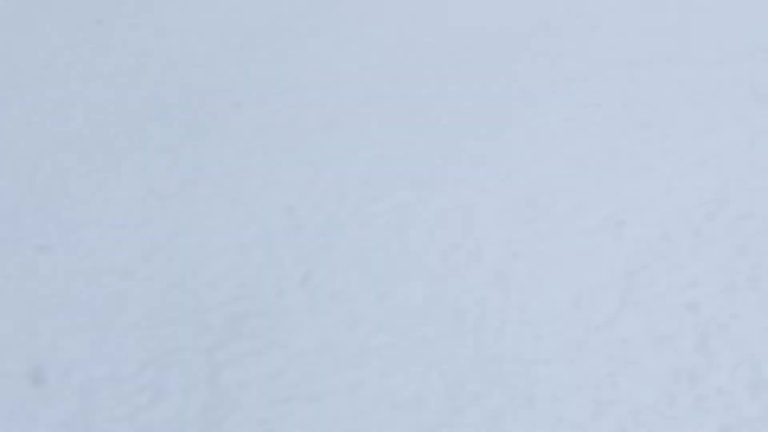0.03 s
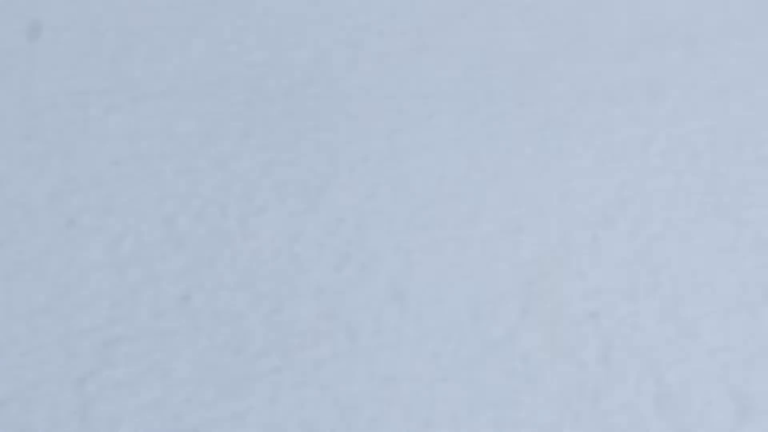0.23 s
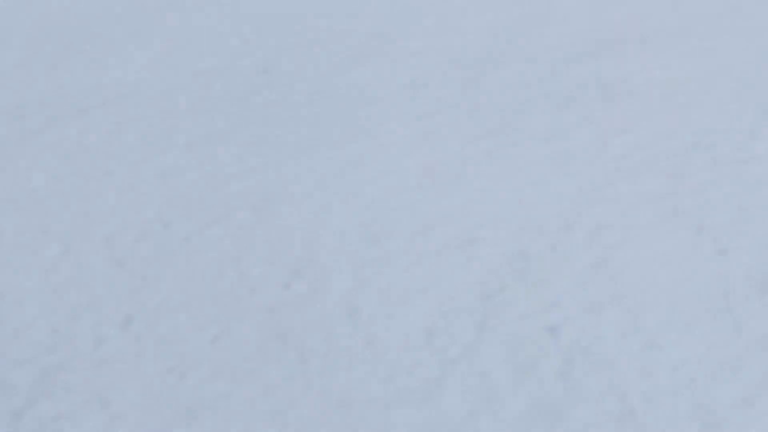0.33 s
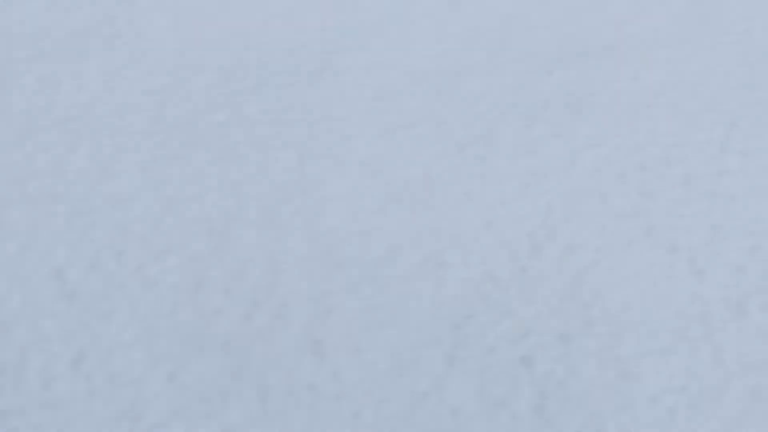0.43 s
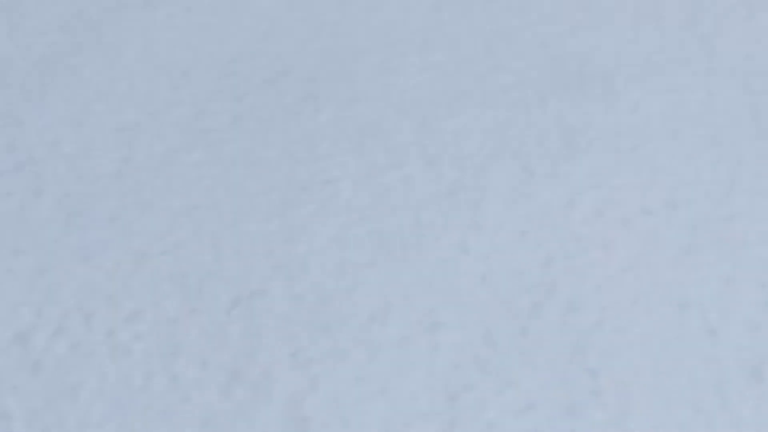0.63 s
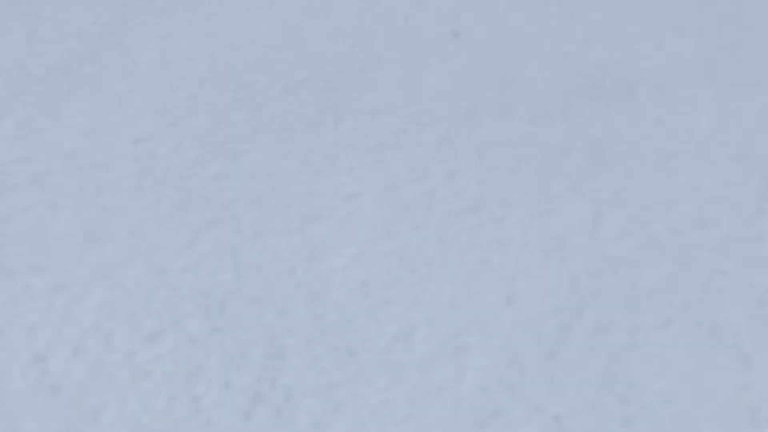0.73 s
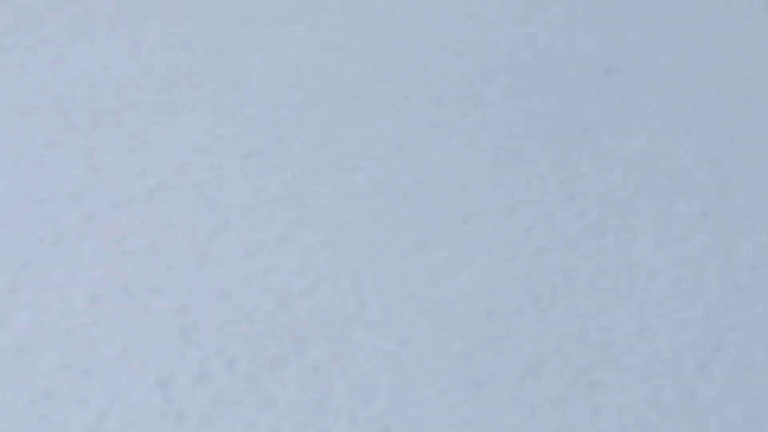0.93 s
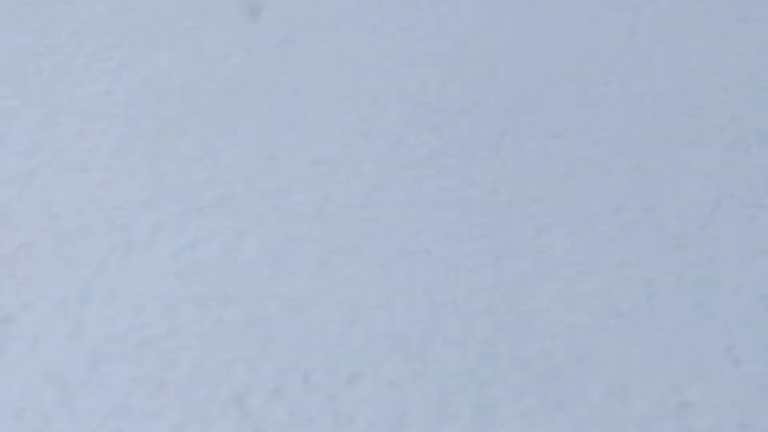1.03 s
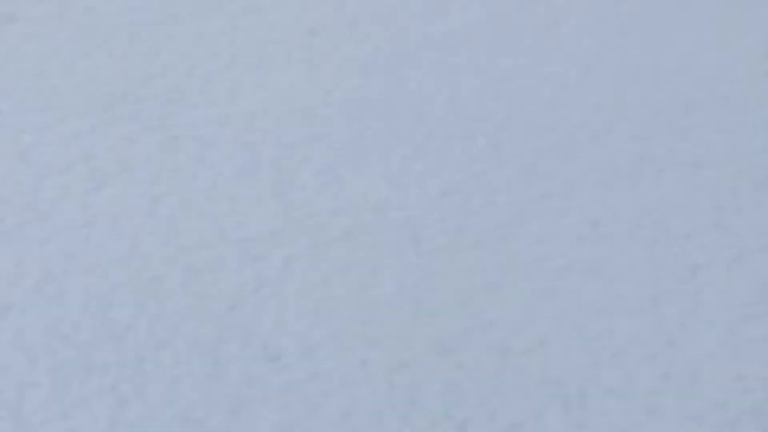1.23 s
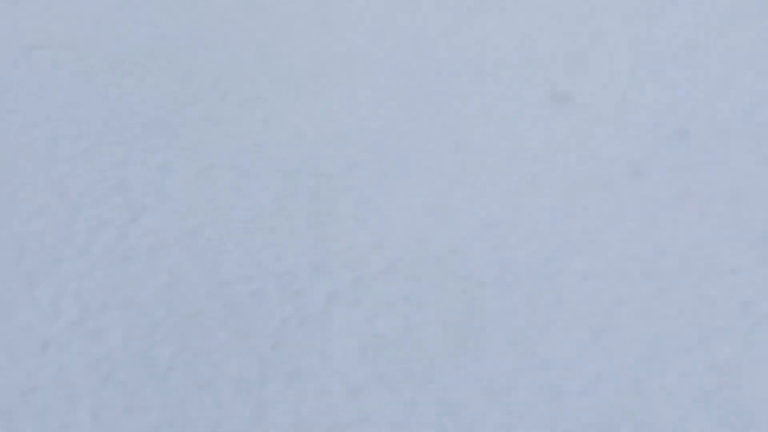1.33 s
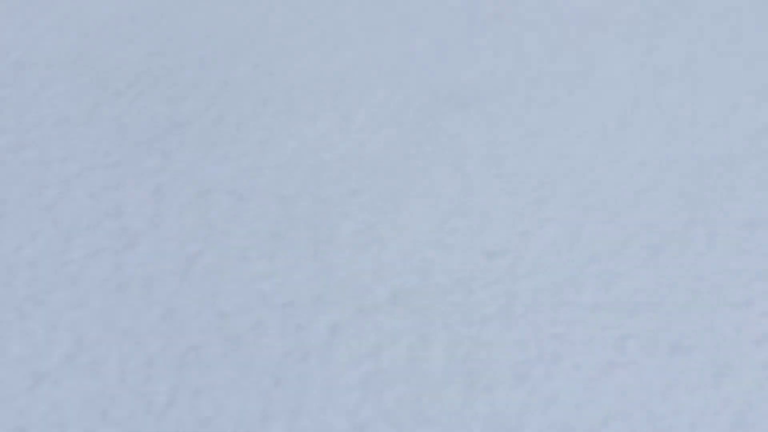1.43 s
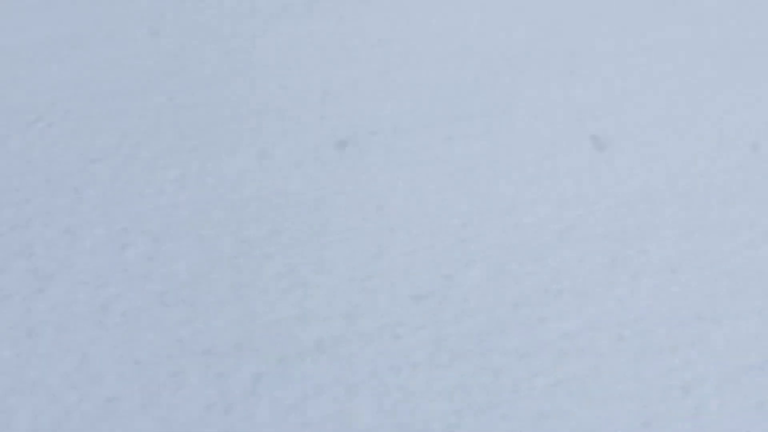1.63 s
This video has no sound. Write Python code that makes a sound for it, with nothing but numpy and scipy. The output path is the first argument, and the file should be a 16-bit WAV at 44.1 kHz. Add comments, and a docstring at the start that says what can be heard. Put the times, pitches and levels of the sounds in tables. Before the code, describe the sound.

Two snowshoe steps crunch in soft snow, heard close up outdoors. Each starts with a sharp knock of the frame, swishes through powder with a brief icy rasp, then packs down with dull thuds. Faint air and hum lie underneath.

```python
"""Out in the open air on soft snow, close to a snowshoe walker taking two steps.
Each step opens with a knock of the shoe's frame, whose bending waves arrive treble first. The deck
swishes through loose powder and the edge rasps over ice grains; then the weight comes down and the
snow packs with a dull, grainy crunch, soft thuds and muffled cracks. Faint air and a low hum lie under it."""
import sys
import numpy as np
from scipy import signal
from scipy.fft import rfft, irfft
from scipy.io import wavfile

SR = 44100
rng = np.random.default_rng(int(sys.argv[2]) if len(sys.argv) > 2 else 0)


def put_to_file(sound):
    """Save the sound as 16-bit audio at rate SR, in the file named by the first command-line argument."""
    columns = np.atleast_2d(sound).T  # one column per channel
    safe = np.clip(columns, -1, 1)
    whole_steps = np.round(safe * 32767)
    wavfile.write(sys.argv[1], SR, whole_steps.astype(np.int16))


N = 74970
T = np.arange(N) / SR

# Tone curves for the noise layers. Each row: frequency in Hz, relative level in dB.
AIR_EQ = [(25, -24), (45, -5), (62, 1.5), (90, -8), (165, -5), (300, -15.5), (700, -15.5), (1800, -17),
          (3000, -26.5), (8000, -39), (16000, -37.5)]
POWDER_EQ = [(70, -19), (115, -7), (190, 7), (300, 2.5), (550, 1), (1000, 0), (2000, -2.5), (3500, -3.5),
             (6000, -5.5), (10000, -12), (16000, -17.5)]
SPRAY_EQ = [(2000, -6.5), (6000, -5.5), (10000, 0.5), (16000, -2.5)]
RASP_EQ = [(300, -8), (1000, 3), (2200, 0), (4000, 0), (6300, -1.5), (8500, -5.5), (11000, -14),
           (16000, -13.5)]
CRACK_EQ = [(150, -10), (500, 6), (900, -0.5), (1600, -6.5), (3000, -23), (8000, -25)]
CRUNCH_EQ = [(25, -46), (45, -20), (65, -2.5), (100, 1.5), (180, 3), (280, 0), (400, -3.5), (800, -11),
             (1300, -19.5), (2500, -26.5), (6000, -47.5)]
RATTLE_EQ = [(120, -22), (200, -9), (400, 3), (700, -0.5), (1300, -8.5), (2500, -14), (6000, -31.5)]
CLICK_EQ = [(1500, -23), (4000, 7), (8000, -12), (16000, 4)]
TICK_EQ = [(500, -17), (1500, 4.5), (2600, -7.5), (4100, 1), (4700, -4.5), (5400, 6.5), (6500, -10),
           (8000, -7), (9500, -23), (10400, 1.5), (11500, -33), (16000, -17)]

# Fader rides for the hum and the powder's swish. Each row: time in seconds, level in dB.
HUM_RIDE = [(0, -61), (.3, -57), (.55, -62), (.8, -63), (1.0, -58), (1.4, -58), (1.7, -54.5)]
SWISH_RIDE = [(0, -53), (.045, -55), (.11, -59), (.17, -53), (.22, -51.5), (.28, -55), (.36, -56),
              (.39, -54.5), (.47, -56.5), (.51, -64), (.75, -71.5), (.82, -61), (.90, -61.5), (.985, -62),
              (1.01, -54), (1.07, -54.5), (1.12, -57), (1.19, -59.5), (1.28, -61.5), (1.35, -60),
              (1.43, -69), (1.56, -65), (1.6, -54.5), (1.7, -60.5)]
# Rides for flung powder and packing snow, one per step. Each row: time in seconds, level in dB.
SPRAY_RIDES = [
    [(.125, -67), (.145, -58), (.25, -78), (.285, -77), (.312, -55), (.345, -79), (.46, -81), (.53, -82)],
    [(.775, -79), (.81, -65.5), (.87, -86), (.98, -91), (1.0, -59.5), (1.085, -58), (1.125, -66),
     (1.19, -76), (1.228, -56.5), (1.27, -78), (1.4, -87)],
]
PACKING_RIDES = [
    [(.15, -57.5), (.24, -54.5), (.30, -50), (.325, -51.5), (.35, -40.5), (.375, -44.5), (.405, -44.5),
     (.425, -44), (.445, -45), (.465, -45), (.49, -54), (.55, -64.5), (.72, -73), (.79, -74)],
    [(1.03, -61), (1.105, -59.5), (1.132, -46.5), (1.19, -49), (1.235, -39), (1.275, -47.5), (1.31, -52.5),
     (1.36, -61), (1.42, -69.5)],
]

# The edge scraping ice. Each row: start in seconds, length in seconds, level in dB.
EDGE_RASPS = [(0.1455, 0.003, -49.5), (0.2916, 0.0034, -47.5), (0.303, 0.021, -48.5), (0.3292, 0.0064, -51),
              (0.373, 0.024, -52.5), (1.21, 0.025, -54), (1.309, 0.0066, -57), (1.359, 0.015, -59)]
# Ice grains hitting the shoe, and crust breaking. Each row: start in seconds, level in dB.
GRAIN_TICKS = [(0.1497, -46), (0.291, -40.5), (0.302, -38), (0.3192, -44), (0.3354, -38), (0.3614, -53),
               (0.384, -53), (0.42, -47)]
CRUST_CRACKS = [(0.2951, -38.5), (0.4339, -35.5), (0.4485, -38), (0.461, -38.5), (1.131, -37),
                (1.146, -41.5), (1.167, -44), (1.221, -41), (1.2431, -40), (1.327, -53)]
# Soft low thuds: snow giving way, and one small bounce of the shoe at 1.017 seconds.
# Each row: start in seconds, level in dB, pitch in Hz.
SOFT_THUDS = [(0.3402, -23, 387), (.392, -35.5, 60), (0.413, -28, 134), (0.4338, -21.5, 231),
              (.450, -33.5, 330), (0.46, -26, 267), (0.464, -24.5, 116), (0.502, -41, 166),
              (.575, -41.5, 169), (0.704, -48.5, 123), (.857, -44, 303), (1.017, -30, 244),
              (1.171, -30.5, 463), (1.178, -34.5, 162), (1.2283, -41, 327), (1.241, -26.5, 292),
              (1.26, -31, 67), (1.260, -25, 160), (1.297, -34.5, 198)]
# The frame's ring. Each row: pitch in Hz, relative level in dB, time to fade by 60 dB (t60) in seconds.
FRAME_MODES = [(506, -26.5, 0.029), (652, -9.5, 0.023), (880, -24.5, 0.069), (1105, -13.5, 0.02),
               (1226, -9.5, 0.014), (1365, -5, 0.016), (1590, -10.5, 0.02), (4250, -3, .02),
               (5300, -18, .012)]
# Knocks of the shoe. Each row: start in seconds, frame drive in dB, contact pitch in Hz, snap level in dB,
# deck pitch in Hz, deck level in dB, deck t60 in seconds, tick level in dB, tick t60 in seconds.
SHOE_KNOCKS = [(0.12, -22.5, 1390, -24, 232, -24, 0.033, -44, 0.0077),
               (.9629, -21.5, 920, -48, 241, -31, 0.062, -35, 0.015),
               (0.9933, -30, 690, -68, 297, -23.5, 0.033, -37.5, 0.029)]


def from_db(db):
    """Decibels to gain."""
    return 10 ** (np.asarray(db) / 20)


def ride(rows):
    """A fader move through rows of seconds and dB."""
    return from_db(np.interp(T, *np.transpose(rows)))


def step_rides(steps):
    """One fader move per step, silent outside them."""
    return sum(ride(step) * (T > step[0][0]) * (T < step[-1][0]) for step in steps)


def colour(x, eq):
    """Minimum-phase EQ, so nothing rings ahead of a hit; comes out at unit rms."""
    size = 2 * N
    hz, db = np.transpose(eq)
    log_hz = np.log(np.fft.rfftfreq(size, 1 / SR) + 1)
    cepstrum = irfft(np.log(from_db(np.interp(log_hz, np.log(hz), db))))
    cepstrum[1:N] *= 2
    cepstrum[N:] = 0
    shaped = irfft(rfft(x, size) * np.exp(rfft(cepstrum)))[:N]
    return shaped / np.sqrt(np.mean(shaped ** 2) + 1e-20)


def noise(eq):
    """Smooth noise with the given tone."""
    return colour(rng.standard_normal(N), eq)


def grains(eq, per_s, spread_db=2):
    """Random clicks of uneven size with the given tone."""
    sizes = from_db(spread_db * np.minimum(rng.exponential(1, N), 3)) * rng.choice([-1, 1], N)
    return colour(sizes * (rng.random(N) < per_s / SR), eq)


def decay(start, t60):
    """Instant attack, then a tail that falls 60 dB in t60 seconds."""
    return (T >= start) * from_db(-60 * np.clip((T - start) / t60, 0, 4))


def fade_in(start, rise_s):
    """A straight ramp up to full level."""
    return np.clip((T - start) / rise_s, 0, 1)


def burst(start, length, attack_s, release_s):
    """Attack, hold and release."""
    return fade_in(start, attack_s) * np.exp(-np.maximum(T - start - length, 0) / release_s)


def ring(start, hz, t60):
    """One struck mode."""
    return decay(start, t60) * np.sin(2 * np.pi * hz * (T - start))


def background(air_db=-63.5, hum_hz=47.5):
    """The bed: faint outdoor air and a low hum that swells and sinks."""
    return from_db(air_db) * noise(AIR_EQ) + ride(HUM_RIDE) * np.sin(2 * np.pi * hum_hz * T)


def powder_spray():
    """Airy hiss of the finest powder, flung up by the knocks and the swinging shoe."""
    return step_rides(SPRAY_RIDES) * grains(SPRAY_EQ, per_s=14000)


def powder_swish():
    """Fine grains slide over the deck, dense enough to blur into a swish."""
    return ride(SWISH_RIDE) * grains(POWDER_EQ, per_s=14000)


def ice_rasps():
    """The edge scrapes coarse ice in short bright runs; single grains tick against the shoe."""
    runs = sum(from_db(db) * burst(start, length, attack_s=0.00063, release_s=0.006)
               for start, length, db in EDGE_RASPS)
    ticks = sum(from_db(db) * decay(start, t60=0.012) for start, db in GRAIN_TICKS)
    return runs * grains(RASP_EQ, per_s=7000, spread_db=3.5) + ticks * noise(RASP_EQ)


def crust_cracks(muffle_hz=2800):
    """Buried crust snaps, muffled by the snow on top."""
    envelope = sum(from_db(db) * decay(start, t60=0.024) for start, db in CRUST_CRACKS)
    muffle = signal.butter(2, muffle_hz, fs=SR, output="sos")
    return signal.sosfilt(muffle, envelope * noise(CRACK_EQ))


def packing_snow():
    """The crunch: many small collapses under the weight, dulled by the snow above them."""
    return step_rides(PACKING_RIDES) * grains(CRUNCH_EQ, per_s=1300)


def soft_thuds(rise_cycles=0.78, t60_cycles=6.5):
    """Soft low thuds a few cycles long: snow giving way, and one small bounce of the shoe."""
    return sum(from_db(db) * ring(start, hz, t60_cycles / hz) * fade_in(start, rise_cycles / hz)
               for start, db, hz in SOFT_THUDS)


def deck_thump(start, hz, t60, rattle_noise, rattle_db=-13):
    """The deck answers a knock with a low thump and a quieter rattle."""
    rattle = from_db(rattle_db) * decay(start, t60=0.054) * rattle_noise
    return (ring(start, hz, t60) + rattle) * fade_in(start, rise_s=0.0028)


def contact(x, hz, q=2.47):
    """A resonant low-pass: the contact favours the modes near its own pitch."""
    angle = 2 * np.pi * hz / SR
    radius = np.exp(-angle / (2 * q))
    poles = [1, -2 * radius * np.cos(angle), radius * radius]
    return signal.lfilter([sum(poles)], poles, x)


def disperse(x, lag_at_1khz_s=0.000501, power=1.505):
    """Bending waves: the lower the pitch, the later it arrives."""
    hz = np.fft.rfftfreq(2 * N, 1 / SR)
    lag = lag_at_1khz_s * (1000 / np.maximum(hz, 150)) ** power
    phase = -2 * np.pi * np.cumsum(lag) * hz[1]
    return irfft(rfft(x, 2 * N) * np.exp(1j * phase))[:N]


def frame_ring(start, drive_db, contact_hz, low_cut_hz=410, return_s=0.0077, return_db=-15.5):
    """The struck frame rings, and the wave comes back once from its far end."""
    modes = sum(from_db(drive_db + db) * ring(start, hz, t60) for hz, db, t60 in FRAME_MODES)
    low_cut = signal.butter(2, low_cut_hz, "high", fs=SR, output="sos")
    wave = disperse(signal.sosfilt(low_cut, contact(modes, contact_hz)))
    return wave + from_db(return_db) * np.interp(T - return_s, T, wave)


def shoe_knocks(click_db=-41, deck_delay_s=0.0057):
    """A click, a tick and a snap give the attack; the frame rings and the deck follows a moment later."""
    click_noise, tick_noise, rattle_noise = noise(CLICK_EQ), noise(TICK_EQ), noise(RATTLE_EQ)
    knocks = np.zeros(N)
    for start, drive_db, contact_hz, snap_db, deck_hz, deck_db, deck_t60, tick_db, tick_t60 in SHOE_KNOCKS:
        click = from_db(click_db) * decay(start, t60=0.0027) * click_noise
        tick = from_db(tick_db) * decay(start, tick_t60) * tick_noise
        snap = from_db(snap_db) * ring(start, hz=2620, t60=0.005)
        deck = from_db(deck_db) * deck_thump(start + deck_delay_s, deck_hz, deck_t60, rattle_noise)
        knocks += click + tick + snap + frame_ring(start, drive_db, contact_hz) + deck
    return knocks


def scene():
    """The mono mix, dry: the snow gives no echo."""
    footfalls = shoe_knocks() + packing_snow() + soft_thuds() + crust_cracks()
    texture = powder_swish() + powder_spray() + ice_rasps()
    return (footfalls + texture + background())[None]


def record(dry, low_cut_hz=36.7, high_cut_hz=15900):
    """The microphone drops the deepest bass; the top is cut steeply."""
    low_cut = signal.butter(4, low_cut_hz, "high", fs=SR, output="sos")
    high_cut = signal.ellip(12, 0.1, 70, high_cut_hz, fs=SR, output="sos")
    return signal.sosfilt(high_cut, signal.sosfilt(low_cut, dry))


dry = scene()
out = record(dry)
put_to_file(out)
```